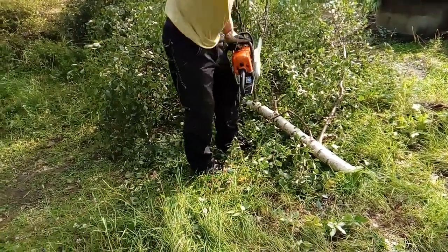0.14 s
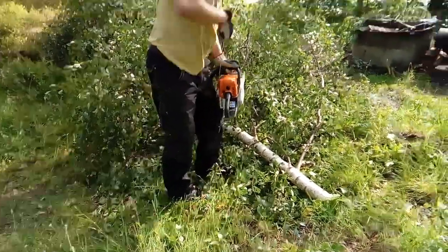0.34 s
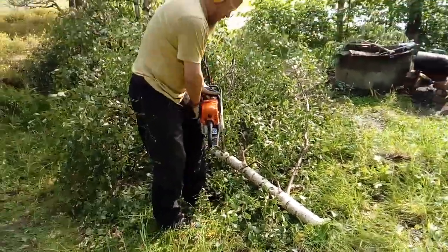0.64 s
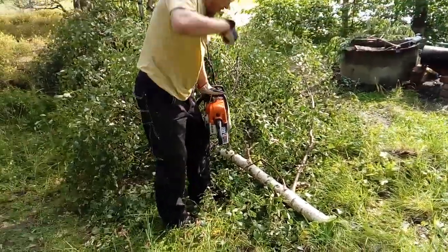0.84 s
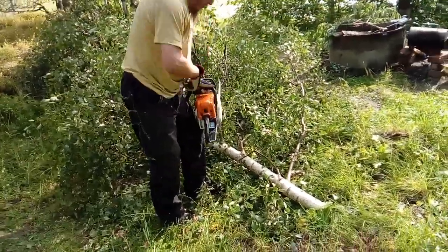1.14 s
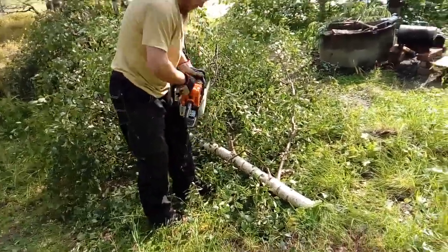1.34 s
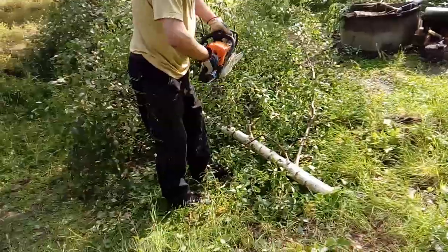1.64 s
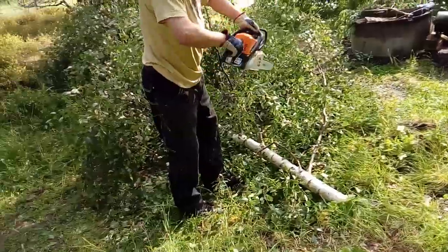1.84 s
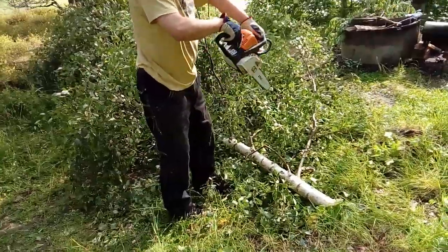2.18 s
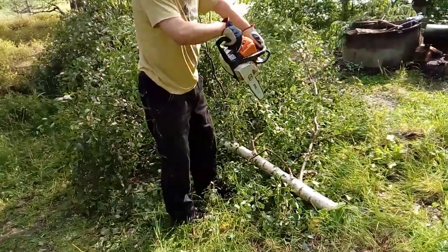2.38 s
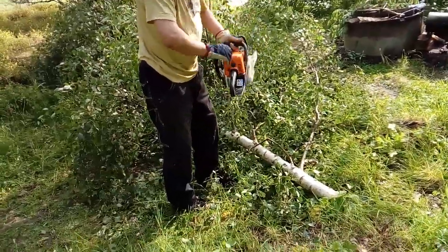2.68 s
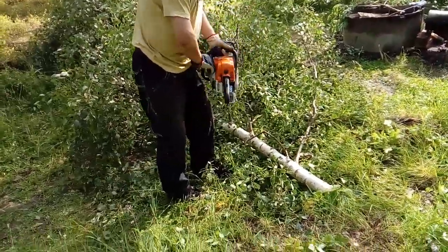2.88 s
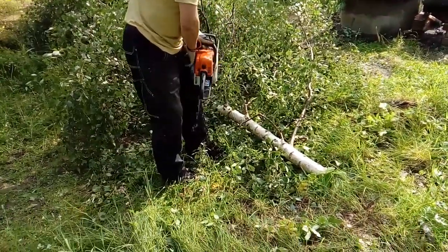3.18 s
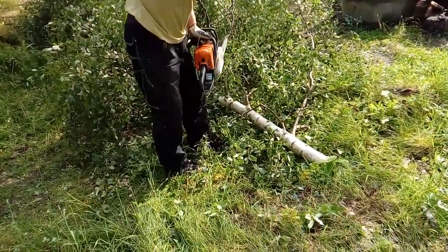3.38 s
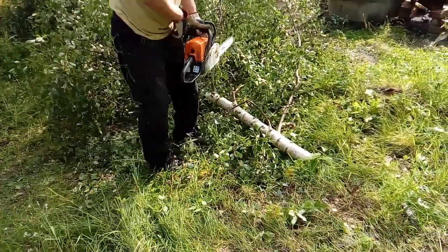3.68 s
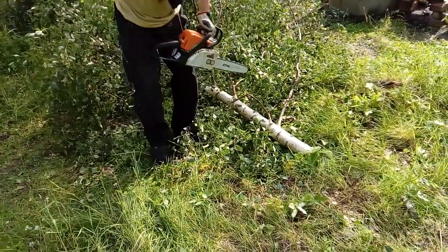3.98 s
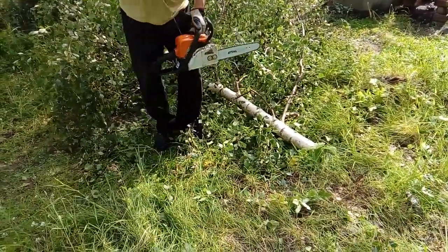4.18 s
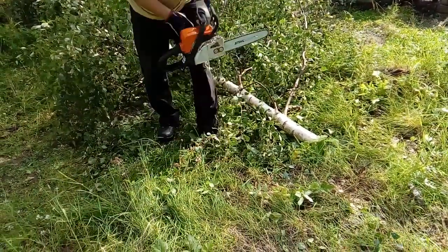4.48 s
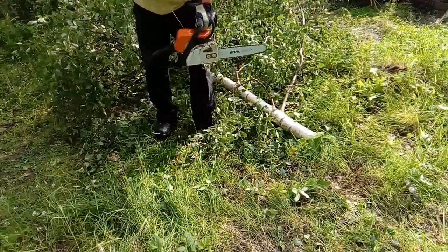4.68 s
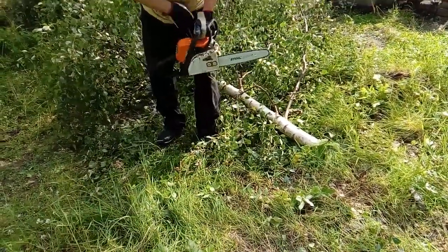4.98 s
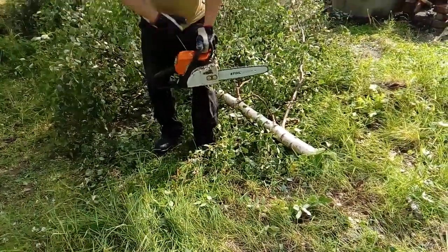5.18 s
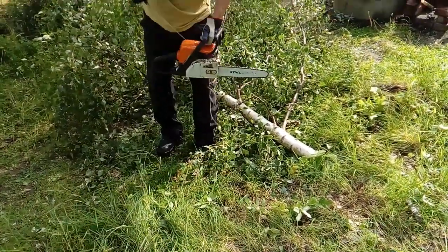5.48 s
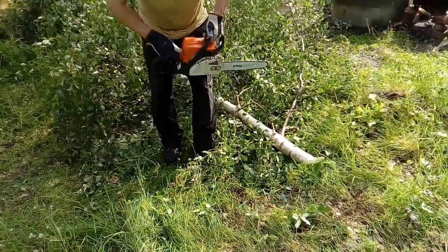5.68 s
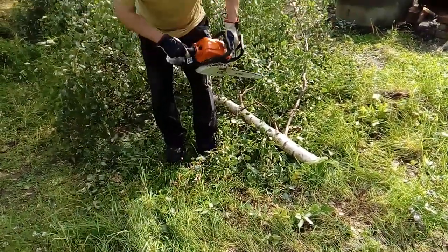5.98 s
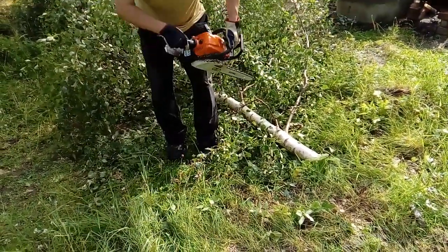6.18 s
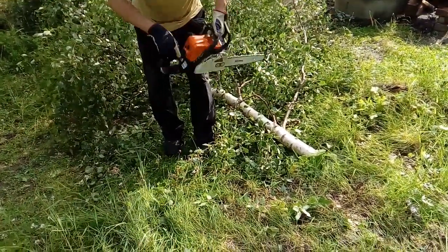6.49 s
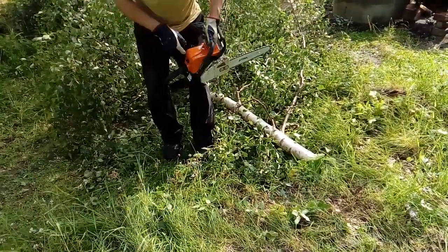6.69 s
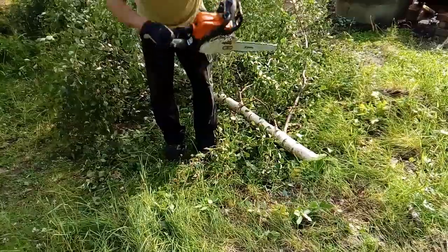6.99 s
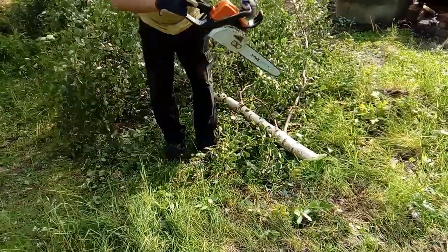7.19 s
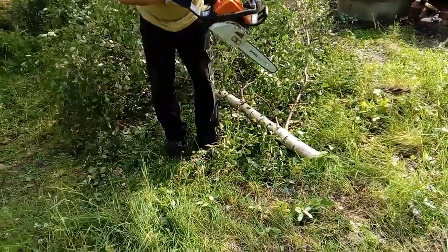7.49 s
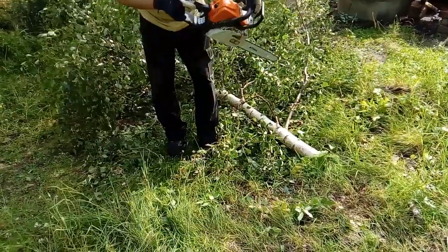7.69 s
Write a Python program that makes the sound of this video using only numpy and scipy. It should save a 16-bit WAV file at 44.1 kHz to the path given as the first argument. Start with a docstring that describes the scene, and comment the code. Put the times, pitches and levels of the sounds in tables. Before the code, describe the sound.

Close, dry outdoor sound of a dead chainsaw being cranked: clack, zipping cord and reel whirr, puffing compression that slows and stalls. It happens twice with a gap, then after a pause of small plastic taps and cloth rustle, four times in rapid rhythm. The cord rewinds and its handle slaps the hollow housing, hardest after the final pull. Low wind thuds mostly on the right; a faint tail from bushes.

```python
"""Pawls clack and a starter cord whirrs: a chainsaw in long grass is pulled over six times and never catches.
On each pull shaped noise chuffs at every turn of a modelled crank, quickly and then ever slower.
The same crank drives the whirr of the reel and the hiss of the cord; each blow on the housing is a noise burst
with a ringing tone. The handle slaps home after the second and the last pull.
Sleeves and grass rustle close by, and filtered noise rumbles as wind on the two microphone ports."""
import sys
import numpy as np
from scipy import signal
from scipy.fft import rfft, irfft
from scipy.io import wavfile

SR = 44100
rng = np.random.default_rng(int(sys.argv[2]) if len(sys.argv) > 2 else 0)


def master_out(mix):
    """Clip the mix to full scale and print it as 16-bit PCM to the path in sys.argv[1]."""
    frames = np.transpose(np.atleast_2d(mix))
    ceiling = np.clip(frames, -1, 1)
    pcm = np.round(ceiling * 32767).astype(np.int16)
    wavfile.write(sys.argv[1], SR, pcm)


N = 345744

# Levels in all event tables are relative: each function trims them for its layers.
# one row a pull: cord taut t/s, first chuff t/s, crank speed then [turns/s], haul [s], top speed [turns/s],
# let-go [s], coasting speed [turns/s], friction [turns/s per s]
PULLS = [(.022, .047, 15.33, .144, 32.97, .075, 17.57, 40.8),
         (.707, .729, 13.22, .143, 33.86, .0736, 17.74, 40.2),
         (3.26, 3.289, 17.43, .157, 32.66, .055, 18.54, 39.9),
         (3.9, 3.974, 13.88, .0655, 33.08, .097, 19.61, 49.3),
         (4.54, 4.619, 18.55, .075, 31.86, .078, 19.81, 50.3),
         (5.165, 5.232, 21.21, .068, 32.6, .0565, 21.36, 52.7)]
# the same pulls: puffs/dB, muffler bark/dB, air thump/dB, first chuff over the others/dB, reel whirr/dB, cord/dB
PULL_LEVELS = [(-27.5, -34, -35, -3.5, -38, -49), (-27.5, -34.5, -37.5, -3.5, -39.5, -61),
               (-26, -33, -37, -26, -39.5, -54.5), (-24.5, -35, -33.5, 4.5, -36.5, -47.5),
               (-22.5, -34.5, -32.5, 2.5, -37, -54.5), (-22.5, -34.5, -33, 0, -36.5, -54)]
# handle and loose parts slapping the housing, and at 0.605 s a dull knock as the crank rocks back # after the
# first pull: t/s, level/dB, hollow body rel. level/dB, snap decay/s,
CLACKS = [(0.425, -33.5, -17, 0.00091, 470, 2), (0.583, -39, -14, 0.0092, 3280, -1),
          (0.605, -45, 1, 0.0064, 596, 8.5), (1.2836, -16, -13, 0.0064, 790, -3),
          (1.2977, -29, -3, 0.0022, 700, 3), (3.297, -46, -9, 0.012, 1710, 9),
          (3.601, -39, -19, 0.0074, 3600, 13), (3.796, -33.5, -18, 0.02, 1275, -11),
          (3.808, -43, -16, 0.0046, 590, 10.5), (3.864, -26.5, -12.5, 0.0069, 1125, -5),
          (3.899, -33.5, -14.5, 0.0047, 724, -14), (4.43, -33.5, -32, 0.0051, 2350, -21),
          (4.489, -50.5, -16, 0.0076, 766, 11.5), (4.527, -35, -20, 0.0079, 2410, -10),
          (5.087, -36.5, -21, 0.0093, 2140, -18), (5.6166, -7.5, -21.5, 0.004, 1200, -7.5),
          (5.6208, -12, -24, 0.0059, 535, -11.5), (5.684, -31.5, -12, 0.0038, 707, 4.5)]
# pawls snapping into the flywheel as a pull starts: t/s, level/dB, chatter decay/s, brightness [dB per octave],
# ring f/Hz, ring rel. level/dB
CATCHES = [(0.021, -17.5, 0.0054, 1.2, 3030, -5), (0.707, -16, 0.0035, 2, 1406, -19),
           (3.228, -36.5, 0.0073, 3, 880, -6), (3.937, -18.5, 0.0019, 5, 900, -18),
           (4.534, -15, 0.0054, 0, 672, -11), (5.164, -13, 0.0046, -1.5, 1300, -6)]
# colour of a hard plastic snap: f/Hz, rel. level/dB
SNAP = [(200, -31.5), (900, -16.5), (1500, -5.5), (2200, -3.5), (3100, 3), (4100, -1.5), (5000, -5.5),
        (6300, -5.5), (8300, -17.5), (13000, -29.5), (16000, -30.5)]
MID_TURNS_PER_S = 20  # chuffs are strongest at this crank speed
SAG_DB_PER_OCTAVE_SQUARED = 4  # and sag on either side
GULP_LEAD_S = .005  # the suction before the port opens


def amp(db):
    """Decibels to gain."""
    return 10 ** (np.asarray(db) / 20)


def unit(x):
    """Scales to rms 1."""
    return x / np.sqrt(np.mean(x ** 2) + 1e-20)


def read(points, hz):
    """A table of (f/Hz, value) read on a log-frequency axis."""
    f, value = np.transpose(points)
    return np.interp(np.log(hz + 1), np.log(f), value)


def add(track, s, sound):
    """Mixes a sound in at s seconds."""
    part = track[max(round(s * SR), 0):][:len(sound)]
    part += sound[:len(part)]


def colour(x, spectrum, modes=()):
    """Causal filter of unit energy: a broad spectrum with resonances standing on it."""
    hz = np.fft.rfftfreq(8192, 1 / SR)
    lifts = sum(lift / (1 + (2 * (hz - f) / width) ** 2) for f, width, lift in modes)
    db = read(spectrum, hz) + lifts
    log_gain = np.log(amp(np.r_[db, db[-2:0:-1]]))
    # minimum phase: the energy comes as early as the spectrum allows
    ring = np.fft.ifft(np.exp(np.conj(signal.hilbert(log_gain)))).real[:len(hz)]
    return signal.oaconvolve(x, ring / np.linalg.norm(ring))[:N]


def wander(rate_hz):
    """Slow random drift of rms 1."""
    hz = np.fft.rfftfreq(N, 1 / SR)
    spectrum = rfft(rng.standard_normal(N)) * np.exp(-(hz / rate_hz) ** 2)
    return unit(irfft(spectrum, N))


def grit(rate_hz, spread_db):
    """Noise that comes in clumps, as from rattling and scraping parts."""
    return unit(rng.standard_normal(N) * amp(spread_db * wander(rate_hz)))


def burst(rise, decay):
    """A short rush of noise with a peak envelope near 1; rise and decay in seconds."""
    t = np.arange(SR // 10) / SR
    shape = (1 - np.exp(-(t / rise) ** 2)) * np.exp(-t / decay)
    return shape / shape.max() * rng.choice([-1., 1.], len(t))


def swells(rows):
    """Gain over time from rows of (t/s, half-length/s, level/dB), each swelling and dying away."""
    t = np.arange(N) / SR
    return sum(amp(db) / np.cosh(np.minimum(abs(t - s) / half, 20)) for s, half, db in rows)


def share_db(lean_db, side):
    """Level of the part of a sound's power that reaches the left (1) or right (-1) port."""
    return -10 * np.log10(1 + amp(-side * lean_db) ** 2)


def fuzzy_tone(hz, width_hz):
    """Noise of rms near 1 in one resonance that follows the curve hz."""
    r = np.exp(-np.pi * width_hz / SR)
    noise = rng.standard_normal(len(hz)) + 1j * rng.standard_normal(len(hz))
    drift = signal.lfilter([np.sqrt(1 - r * r)], [1, -r], noise)
    return (drift * np.exp(2j * np.pi * np.cumsum(hz) / SR)).real


def rattle(per_s, low_hz, high_hz, cycles, spread_db, count=20):
    """Tiny random contacts, each ringing briefly at one of count pitches."""
    t = np.arange(1024) / SR
    out = np.zeros(N)
    for hz in np.geomspace(low_hz, high_hz, count):
        at, size, sign = rng.random((3, int(np.clip(per_s, 1, 5000) * N / SR / count)))
        contacts = np.zeros(N)
        strength = amp(-spread_db * np.log(np.maximum(size, .02)))
        contacts[(at * N).astype(int)] = strength * np.sign(sign - .5)
        ring = np.sin(2 * np.pi * hz * t) * np.exp(-hz * t / cycles) * np.sqrt(hz)
        out += signal.oaconvolve(contacts, ring)[:N]
    return unit(out)


def surroundings(air_db=-72, rustle_db=-1.5, crackle_db=-5):
    """Still air is steady noise; sleeves and grass brush close by as swells of grit and tiny ringing contacts."""
    # colour of the still air: f/Hz, rel. level/dB
    air_colour = [(120, -29), (200, -5), (249, -5), (387, -6), (529, -11), (950, -13), (2170, -17),
                  (6050, -18.5), (7970, -27), (13300, -30.5), (14900, -21.5), (16000, -34.5)]
    # colour of cloth: f/Hz, rel. level/dB
    cloth_colour = [(200, -17.5), (900, -8.5), (3500, -2.5), (6000, -7), (8500, -14), (14000, -23)]
    # sleeves and grass brushing: t/s, half-length/s, level/dB
    rustles = [(1.59, 0.018, -71), (2.03, 0.035, -67.5), (2.6, 0.032, -72.5), (2.88, 0.084, -74.5),
               (3.15, 0.056, -73), (5.78, 0.027, -66.5), (5.965, 0.0077, -70.5), (6.5, 0.045, -72),
               (6.88, 0.015, -70), (6.935, 0.022, -73), (7.06, 0.035, -66.5), (7.8, 0.045, -69)]
    air = np.array([colour(rng.standard_normal(N), air_colour) for _ in range(2)])
    cloth = np.array([colour(grit(rate_hz=70, spread_db=1.5), cloth_colour) for _ in range(2)])
    grass = rattle(per_s=1400, low_hz=1900, high_hz=5000, cycles=2, spread_db=2.5, count=8)
    brushing = amp(rustle_db) * cloth + amp(crackle_db) * grass
    return amp(air_db) * air + swells(rustles) * brushing


def wind(rumble_db=3.0, buffet_db=-7.5, strong_db=-40, growth=1.49, lumpy_db=2.5, flutter_db=2.5):
    """Eddies strike each microphone port separately; the strong ones reach higher in pitch."""
    # the steady breeze: t/s, level/dB
    breeze_levels = [(0, -43.5), (.3, -42), (1.15, -66), (1.501, -50.5), (2.1, -65.5), (3.2, -59.5),
                     (3.8, -52.5), (4.5, -68), (5.3, -51), (5.9, -53), (6.7, -50.5), (6.88, -58),
                     (7.3, -55), (7.84, -55.5)]
    # gusts on top of it: t/s, half-length/s, level/dB, left minus right/dB
    gust_rows = [(0.106, 0.036, -40, -17), (0.225, 0.01, -38.5, -22), (0.446, 0.045, -41.5, -4),
                 (0.572, 0.024, -37, 30.5), (0.702, 0.017, -44.5, 20), (1.303, 0.014, -53.5, 0),
                 (1.41, 0.049, -51.5, -32), (1.77, 0.021, -49, -37), (2.313, 0.023, -47.5, -21),
                 (2.39, 0.026, -41, -39), (2.505, 0.022, -52, -16), (2.938, 0.028, -49.5, -32),
                 (3.185, 0.028, -50.5, -38), (3.383, 0.044, -46, 9), (4.055, 0.033, -54, 18),
                 (4.845, 0.069, -53.5, -4.5), (5.14, 0.033, -38.5, -34), (5.374, 0.024, -44.5, -3),
                 (5.672, 0.086, -43.5, -34), (5.975, 0.011, -58, -9), (6.221, 0.074, -48.5, -18),
                 (6.434, 0.041, -42, -23), (6.617, 0.013, -34.5, -9), (6.719, 0.032, -38, -40),
                 (7.055, 0.045, -43, -17), (7.141, 0.041, -40.5, -21), (7.472, 0.019, -43, -33.5)]
    # colour of the low rumble: f/Hz, rel. level/dB
    rumble_colour = [(15, -25.5), (35, -14.5), (60, -5.5), (90, 0.5), (135, -7), (200, -25), (320, -35),
                     (800, -66.5), (3000, -95.5)]
    # colour of the buffeting: f/Hz, rel. level/dB
    buffet_colour = [(40, -16.5), (150, 2.5), (250, -9.5), (400, -21), (800, -37.5), (3000, -72)]
    breeze_lean_db = -17.5  # left minus right: mostly on the right port
    t = np.arange(N) / SR
    ports = []
    for side in 1, -1:
        breeze_db = np.interp(t, *np.transpose(breeze_levels)) + share_db(breeze_lean_db, side)
        breeze = amp(breeze_db + lumpy_db * wander(rate_hz=5.6))
        gusts = swells([(s, half, db + share_db(lean, side)) for s, half, db, lean in gust_rows])
        force = np.hypot(breeze, gusts) * amp(flutter_db * wander(rate_hz=33))
        rumble = colour(rng.standard_normal(N), rumble_colour) * force
        # buffeting grows faster than the force itself
        buffet_force = amp(strong_db) * (force / amp(strong_db)) ** growth
        buffet = colour(rng.standard_normal(N), buffet_colour) * buffet_force
        ports.append(amp(rumble_db) * (rumble + amp(buffet_db) * buffet))
    return np.array(ports)


def thumps(thump_db=-3, hz=135, width=0.0033):
    """A single eddy presses on a port for one or two swings; width in seconds."""
    # eddies: t/s, level/dB, left minus right/dB
    eddies = [(0.08, -21.5, -25), (0.402, -25.5, -25), (0.422, -26.5, 18), (0.533, -20, 26),
              (0.551, -21.5, 23), (0.569, -22.5, 16), (5.106, -28, -32.5), (6.602, -36, -19),
              (6.696, -31, -34), (7.127, -32, -21)]
    out = np.zeros((2, N))
    t = np.arange(SR // 20) / SR
    for s, db, lean in eddies:
        pitch_hz = hz * (1 + 0.14 * rng.standard_normal())
        envelope = (t / width) ** 2 * np.exp(1 - (t / width) ** 2)
        swing = np.sin(2 * np.pi * pitch_hz * t) * envelope
        for track, side in zip(out, (1, -1)):
            add(track, s, amp(db + thump_db) * swing * 2 / (1 + amp(-side * lean)))
    return out


def yard(x):
    """A short, diffuse tail from the bushes and trees: decaying noise, separate at each port."""
    # reverberation: f/Hz, time to fall 60 dB/s
    decay_times = [(200, 0.58), (1000, 0.29), (4000, 0.38), (12000, 0.28)]
    f, when, z = signal.stft(rng.standard_normal((2, SR // 2)), SR, nperseg=256)
    fade = amp(-60 * when / read(decay_times, f)[:, None]) * (1 - np.exp(-when / .012))
    tail = signal.istft(z * fade, SR, nperseg=256)[1]
    return signal.oaconvolve(x[None], tail / np.linalg.norm(tail[0]), axes=1)[:, :N]


def paths(lag=.000048, size=1024):
    """The sound reaches the right port first, by lag seconds; legs and leaves scatter it differently to each."""
    # the saw at the two ports: f/Hz, left minus right/dB
    port_lean = [(100, 3), (220, 8), (400, 1), (700, 0), (1300, -5), (2400, -4), (4400, -4), (8000, 1.5),
                 (15000, -1)]
    # scattered over direct sound: f/Hz, level/dB
    scatter_levels = [(200, -10.5), (800, -13), (2000, -1.5), (4000, -1), (8000, 2)]
    t, hz = np.arange(size) / SR, np.fft.rfftfreq(size, 1 / SR)
    near = rng.standard_normal((2, size)) * amp(-60 * t / .014) * (t > .001)
    near = rfft(near / np.linalg.norm(near, axis=1, keepdims=True)) * amp(read(scatter_levels, hz))
    direct = np.exp(-2j * np.pi * hz * (10 / SR + np.array([[lag], [0]])))
    balance = amp(np.array([[.5], [-.5]]) * read(port_lean, hz))
    return irfft((direct + near) * balance, size)[:, :size // 2]


def outdoors(x, saw_db=-1.0, yard_db=-15, size=8192):
    """The saw swings about, so one random set of paths to the ports keeps fading into the next."""
    out = np.zeros((2, N + size))
    padded, window = np.pad(x, (size // 2, size)), signal.get_window("hann", size)
    for start in range(0, N + size // 2, size // 2):
        piece = padded[start:start + size] * window
        heard = signal.fftconvolve(piece[None], paths(), axes=1)
        for track, sound in zip(out, heard):
            add(track, start / SR, sound)
    near_sound = out[:, size // 2:][:, :N]
    return amp(saw_db) * near_sound + amp(yard_db) * yard(x)


def clacks(snap_db=-10, body_db=2, strike_db=25, crack_db=5, ring_db=-3, rise=0.00006, body_length=1.7,
           ring_s=0.018, ring_length=4.2):
    """Slaps, knocks and taps on hard plastic: a bright snap, the hollow housing and the struck part ringing."""
    # starter parts knocking as compression jerks the crank: t/s, level/dB, hollow body rel. level/dB,
    # snap decay/s, ring f/Hz, ring rel. level/dB
    knocks = [(0.797, -28, -36, .002, 2930, 0), (0.837, -31, -32, 0.0025, 3030, 1.5),
              (1.058, -34.5, -14, .002, 1400, -3.5), (1.145, -30, -14, 0.0046, 1150, -3),
              (4.022, -21, -31.5, .0012, 3200, -8), (4.054, -24, -13, 0.0011, 735, -8),
              (4.185, -33, -32, .008, 4400, 5), (4.249, -29.5, -16, 0.0033, 710, -14),
              (4.558, -38, -7, 0.0018, 1100, -10), (4.574, -41, -10, .002, 1330, 11),
              (4.625, -25, -26, .002, 1020, 0), (4.661, -23, -24, 0.0018, 5900, -9),
              (4.666, -27, -28, 0.0018, 4230, 1), (4.718, -25.5, -15, 0.0035, 3870, -3),
              (4.78, -27, -34, 0.0016, 4390, -1), (4.83, -29.5, -20, .002, 3900, -1),
              (4.84, -25.5, -25, 0.0022, 4270, -4), (5.274, -25, -26, 0.0021, 3380, 1),
              (5.392, -32, -36, 0.0018, 3600, -5), (5.442, -33, -21, 0.0018, 4050, 8)]
    # hands tapping the housing and its switches: t/s, level/dB, hollow body rel. level/dB,
    # snap decay/s, ring f/Hz, ring rel. level/dB
    taps = [(1.567, -56, -19, 0.0091, 3370, -3), (1.635, -54, -18, 0.0074, 2490, -8),
            (1.898, -53.5, -13, 0.012, 1160, -6), (2.28, -65, -17.5, 0.0067, 3020, -17),
            (2.37, -56, -14, 0.0053, 3040, -13), (2.547, -47.5, -25, 0.002, 2045, 2),
            (2.638, -57.5, -23, .004, 1860, -4), (2.751, -57, -23, .004, 3500, -7),
            (2.837, -54.5, -19, .003, 2060, -0.5), (2.857, -44, -20, 0.004, 3440, -9),
            (2.884, -48.5, -18, 0.0039, 3600, -5), (2.898, -51, -15, 0.0044, 1040, -5),
            (2.911, -47, -23, 0.0022, 3500, -10), (2.993, -51, -20, 0.0086, 760, -9),
            (3.083, -68.5, -15, 0.012, 780, 18.5), (3.153, -49.5, -22, 0.0048, 755, -7),
            (3.182, -52.5, -26, 0.0048, 754, -8), (5.963, -63.5, -7.5, 0.0058, 3000, -8),
            (6.531, -48.5, -25, 0.0046, 3734, -11), (6.906, -56, -15, .004, 1200, -6),
            (6.917, -50, -21, .005, 2790, -7), (6.982, -53.5, -14, .005, 2350, -12),
            (7.203, -59, -15.5, 0.0038, 3260, -2), (7.24, -60.5, -17, 0.0035, 3200, -5.5),
            (7.819, -54, -16, 0.0066, 730, -5), (7.833, -56, -5.5, .006, 900, 0)]
    # colour of the hollow housing: f/Hz, rel. level/dB
    hollow = [(80, -21.5), (300, -17.5), (480, -2.5), (750, 3), (1250, -2.5), (1900, -2.5), (3500, -30),
              (12000, -52.5)]
    # resonances of the starter cover under a blow: f/Hz, width/Hz, lift/dB
    cover = [(535, 75, 9.5), (690, 200, 4.5), (1100, 220, 9), (1330, 190, 3.5)]
    snap, body, ring = np.zeros((3, N))
    t = np.arange(SR // 16) / SR
    for s, db, body_rel, decay, hz, ring_rel in CLACKS + knocks + taps:
        # first contact is one solid push; the loose parts chatter around and after it
        add(snap, s + .0005, [amp(db + crack_db)])
        add(body, s + 0.00061, [amp(db + body_rel + strike_db)])
        add(snap, s, amp(db + snap_db) * burst(rise, decay))
        add(body, s, amp(db + body_rel + body_db) * burst(rise, decay * body_length))
        ring_fade = amp(-60 * t / (ring_s + ring_length * decay))
        add(ring, s, amp(db + ring_rel + ring_db) * ring_fade * np.sin(2 * np.pi * hz * t))
    return colour(snap, SNAP) + colour(body, hollow, cover) + ring


def spring(hz=3420, width_hz=260):
    """The coiled recoil spring rings, as one narrow band of noise, while its turns slide over each other."""
    # the spring winding back: t/s, half-length/s, level/dB
    windings = [(4.315, 0.011, -53), (4.803, 0.0063, -48), (4.98, 0.015, -47.5), (5.655, 0.01, -41)]
    return swells(windings) * fuzzy_tone(np.full(N, hz), width_hz)


def catches(push_db=3, chatter_db=-9, rise=0.00026, ring_t60=.04, ring_rise_s=0.00087):
    """Each pawl catch is one hard push and a short chatter, ringing the flywheel and one part of its cover."""
    # colour of the pawls: f/Hz, rel. level/dB
    pawl = [(120, -13), (270, 2.5), (410, -12.5), (550, -2), (930, -7), (1400, -2), (2200, -5.5),
            (3500, -4), (6300, -12.5), (8300, -21), (13000, -39.5), (16000, -40)]
    # their resonances: f/Hz, width/Hz, lift/dB
    pawl_modes = [(715, 110, 10), (1127, 200, 6.7), (1350, 400, 5.7), (3020, 350, 4.5)]
    out = np.zeros(N)
    t = np.arange(SR // 16) / SR
    for s, db, decay, tilt, ring_hz, ring_rel in CATCHES:
        blow = np.zeros(SR // 4)
        add(blow, 0, amp(chatter_db) * burst(rise, decay))
        add(blow, .001, [amp(push_db)])
        spectrum = [(hz, level + tilt * np.log2(hz)) for hz, level in pawl]
        add(out, s, amp(db) * colour(blow, spectrum, pawl_modes))
        ring_fade = amp(db + ring_rel - 60 * t / ring_t60) * (1 - np.exp(-t / ring_rise_s))
        add(out, s, ring_fade * np.sin(2 * np.pi * ring_hz * t))
    return out


def crank(pull):
    """Crank speed climbs during the haul, drops as the cord runs out, then coasts down against friction."""
    taut, first, start, haul, top, let_go, coast, friction = pull
    free = first + haul + let_go
    times = [taut, first, first + haul, free, free + coast / friction]
    return np.interp(np.arange(N) / SR, times, [start, start, top, coast, 0], 0, 0)


def chuffs(pull, stall_turns_per_s=8):
    """(t/s, crank speed) of every whole turn until compression stalls the crank."""
    speed, first = crank(pull), round(pull[1] * SR)
    turns = np.cumsum(speed[first:]) / SR
    at = first + np.searchsorted(turns, np.arange(int(turns[-1]) + 1))
    return [(i / SR, speed[i]) for i in at if speed[i] > stall_turns_per_s]


def jerks(click_db=-1, within_s=.014, uneven_db=2, count=3):
    """Every compression after the first jerks the starter, and its loose teeth give a few sharp clicks."""
    out = np.zeros(N)
    for pull, (puff, *_) in zip(PULLS, PULL_LEVELS):
        for s, speed in chuffs(pull)[1:]:
            sag = SAG_DB_PER_OCTAVE_SQUARED * np.log2(speed / MID_TURNS_PER_S) ** 2
            for when, size in zip(rng.random(count), rng.standard_normal(count)):
                click = np.sign(size) * amp(puff + click_db - sag + uneven_db * abs(size))
                add(out, s + within_s * when ** 2, [click])
    return colour(out, SNAP)


def housed(x, spectrum, shift=0.045):
    """Muffler and housing colour the sound: one way end-on, another side-on, wavering as the saw swings."""
    # resonances heard end-on: f/Hz, width/Hz, lift/dB
    housing_end = [(780, 150, 7.5), (1260, 300, 3.5), (1750, 200, 2), (3000, 250, 1)]
    # resonances heard side-on: f/Hz, width/Hz, lift/dB
    housing_side = [(763, 99, 7), (1150, 200, 10), (1673, 80, 11), (3600, 600, 5.4), (4370, 350, 6.5)]
    # the saw turns from end-on to side-on: start t/s, end t/s
    swing_round = [2.95, 4.1]
    turn = np.pi / 4 * (1 + np.tanh(wander(rate_hz=7)))
    views = []
    for modes in housing_end, housing_side:
        low, high = (colour(x, spectrum, [(hz * k, width, lift) for hz, width, lift in modes])
                     for k in (1 - shift / 2, 1 + shift / 2))
        views.append(np.cos(turn) ** 2 * low + np.sin(turn) ** 2 * high)
    side_on = np.interp(np.arange(N) / SR, swing_round, [0, 1])
    return (1 - side_on) * views[0] + side_on * views[1]


def reel(shake_whirr_db=-33, shake_cord_db=-40, settle_s=0.041, slack_db=-52, slack_lead_s=0.0089,
         slack_s=0.0029):
    """Strength of whirr and cord hiss: they follow the crank, swell on rewinds and are shaken by each blow."""
    # the cord running onto or off its reel: t/s, half-length/s, whirr level/dB, hiss level/dB
    rewinds = [(0.423, 0.00037, -52, -30.5), (0.448, 0.03, -50, -56), (0.555, 0.011, -52.5, -62),
               (1.147, 0.0052, -45.5, -47), (1.171, 0.0057, -40.5, -48), (1.268, 0.025, -51, -60),
               (3.681, 0.018, -41.5, -42.5), (3.865, 0.0069, -47, -43), (4.344, 0.011, -44.5, -45.5),
               (4.428, 0.047, -55, -58.5), (4.968, 0.014, -45.5, -52.5), (5.144, 0.051, -59.5, -76),
               (5.582, 0.012, -41.5, -47.5)]
    full_turns_per_s, whirr_db_per_octave, cord_db_per_octave = 32, 10, 15  # growth with crank speed
    whirr = swells([(s, half, db) for s, half, db, _ in rewinds])
    cord = swells([(s, half, db) for s, half, _, db in rewinds])
    # the reel spins briefly on its own while the slack is taken up
    whirr = whirr + swells([(taut - slack_lead_s, slack_s, slack_db) for taut, *_ in PULLS])
    for pull, (*_, whirr_db, cord_db) in zip(PULLS, PULL_LEVELS):
        octaves = np.log2(crank(pull) / full_turns_per_s + 1e-9)
        whirr = np.hypot(whirr, amp(whirr_db + whirr_db_per_octave * octaves))
        cord = np.hypot(cord, amp(cord_db + cord_db_per_octave * octaves))
    shake = np.zeros(N)
    for s, db, *_ in CATCHES + CLACKS:
        add(shake, s, amp(db) * np.exp(-np.arange(SR // 3) / SR / settle_s))
    return np.hypot(whirr, amp(shake_whirr_db) * shake), np.hypot(cord, amp(shake_cord_db) * shake)


def starter(whirr_db=-1, rattle_db=-4.0, judder_db=2, cord_db=-3):
    """The reel and flywheel whirr and rattle in the housing while the cord slides through its eyelet."""
    # colour of the whirr: f/Hz, rel. level/dB
    whirr_colour = [(100, -21), (290, 3), (470, -2), (750, -4.5), (1300, -10.5), (2200, -3.5), (3600, -1.5),
                    (5000, -6), (6800, -7.5), (8300, -25.5), (11000, -34.5), (16000, -48.5)]
    # colour of the sliding cord: f/Hz, rel. level/dB
    cord_colour = [(1000, -25), (4000, -0.5), (7000, 4.5), (9500, 2.5), (12000, -7), (14000, -14),
                   (15200, -1), (16200, -13.5)]
    whirr, cord = reel()
    ticks = rattle(per_s=600, low_hz=700, high_hz=6800, cycles=2.4, spread_db=3)
    whirring = housed(grit(rate_hz=1400, spread_db=3.0), whirr_colour)
    parts = amp(whirr_db) * whirring + amp(rattle_db) * ticks
    sliding = grit(rate_hz=200, spread_db=2.5)
    judder = unit(amp(judder_db * wander(rate_hz=110)))  # the reel drags and frees itself unevenly
    return parts * whirr * judder + amp(cord_db) * colour(sliding * cord, cord_colour)


def port_whistle(turn, low_hz=4200, high_hz=6700, width_hz=450, length_share=0.34):
    """Air squeezed through the moving port edge: a faint whistle that arches up and down once a turn."""
    u = np.linspace(0, 1, int(np.clip(length_share * turn, .004, .04) * SR))
    arch = np.sin(np.pi * u ** 1.4)
    pitch_hz = (low_hz + (high_hz - low_hz) * arch) * (1 + .07 * rng.standard_normal())
    return np.sin(np.pi * u) * fuzzy_tone(pitch_hz, width_hz)


def muffler_ring(low_hz=650, high_hz=1400, t60=.03, rise_s=0.0032):
    """Each chuff sets a different panel of the muffler ringing, at a random pitch."""
    t = np.arange(SR // 20) / SR
    hz = low_hz * (high_hz / low_hz) ** rng.random()
    return np.sin(2 * np.pi * hz * t) * amp(-60 * t / t60) * (1 - np.exp(-t / rise_s))


def gulp(swell_s=0.00053, release_s=.00018, rebound_s=.0034, rebound_db=-7, scatter=.1):
    """Suction builds and snaps as the port opens; a weaker gulp follows, and the cavity answers both."""
    # colour of the gulp of air: f/Hz, rel. level/dB
    gulp_colour = [(40, -19.5), (110, 1.5), (180, -5), (280, -2.5), (480, -5), (750, 2), (1150, 1),
                   (1600, -6), (4000, -12.5), (12000, -28.5)]
    # the engine's cavities: f/Hz, width/Hz, lift/dB
    cavities = [(285, 130, 6), (1090, 110, 5)]
    t = np.arange(SR // 25) / SR - GULP_LEAD_S
    a, b = np.exp(scatter * rng.standard_normal(2))
    suck = np.zeros(len(t))
    for at, gain in (0, 1), (rebound_s * b, amp(rebound_db)):
        suck += gain * np.exp(np.minimum((t - at) / (swell_s * a), (at - t) / release_s))
    sound = colour(suck, gulp_colour, cavities)[:SR // 12]
    return -sound / abs(sound).max()


def piston(hiss_db=-13, bark_db=-1.5, thump_db=9, whistle_db=-23, ring_db=-3, second_db=-7.0, uneven_db=1.0,
           lag_per_s=3.3, puff_share=0.1, bark_share=0.043, rise=0.0061, lead=.003, slowest=.09, port_share=.135):
    """Each turn uncovers the port twice; the slower the crank, the longer the puffs and the wider apart."""
    # colour of the puffs: f/Hz, rel. level/dB
    puff_colour = [(200, -20), (900, -18.5), (1800, -0.5), (3500, 3), (5000, 2.5), (6800, -1), (8500, -19),
                   (13000, -39.5), (16000, -34.5)]
    # colour of the muffler's bark: f/Hz, rel. level/dB
    bark_colour = [(100, -15.5), (300, -7), (480, -4.5), (700, -1), (1200, -5), (1800, -6.5), (3000, -26.5),
                   (12000, -56)]
    puff_db_per_octave, bark_db_per_octave = 1, 1  # growth with crank speed
    thump_knee_turns_per_s = 17.6  # well below this speed the air leaks away without a thump
    hiss, bark, tones = np.zeros((3, N))
    for pull, (puff, muffler, air, first_db, _, _) in zip(PULLS, PULL_LEVELS):
        for k, (s, speed) in enumerate(chuffs(pull)):
            turn, octaves = min(1 / speed, slowest), np.log2(speed / MID_TURNS_PER_S)
            chance = rng.standard_normal(2)
            sag = SAG_DB_PER_OCTAVE_SQUARED * octaves ** 2
            db = (first_db if k == 0 else 0) + uneven_db * chance[0] - sag
            puff_gain = amp(db + puff + hiss_db + puff_db_per_octave * octaves)
            bark_gain = amp(db + muffler + bark_db + bark_db_per_octave * octaves)
            second_gain = amp(second_db + uneven_db * chance[1])
            # the rush swells as the piston edge slides off the port
            for delay, gain in (0, 1), (lag_per_s * turn ** 2, second_gain):
                add(hiss, s + delay - lead, gain * puff_gain * burst(rise, puff_share * turn))
                add(bark, s + delay - lead, gain * bark_gain * burst(rise, bark_share * turn))
            add(tones, s - lead, amp(db + puff + whistle_db) * port_whistle(turn))
            add(tones, s, amp(db + muffler + ring_db) * muffler_ring())
            opens = s - lead + port_share * turn
            leak = 1 + (thump_knee_turns_per_s / speed) ** 8
            add(tones, opens - GULP_LEAD_S, amp(db + air + thump_db) * gulp() / leak)
    return housed(hiss, puff_colour) + housed(bark, bark_colour) + tones


def scene():
    """The saw in the yard, with wind on the microphone and the close surroundings."""
    saw = piston() + jerks() + starter() + spring() + catches() + clacks()
    return outdoors(saw) + wind() + thumps() + surroundings()


def record(dry, edge_hz=15900):
    """The recorder's band limit: a low-pass filter."""
    low_pass = signal.firwin(401, edge_hz, window=("kaiser", 8), fs=SR)
    return signal.oaconvolve(dry, low_pass[None], "same")


dry = scene()
out = record(dry)
master_out(out)
```